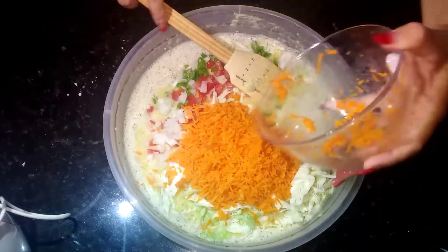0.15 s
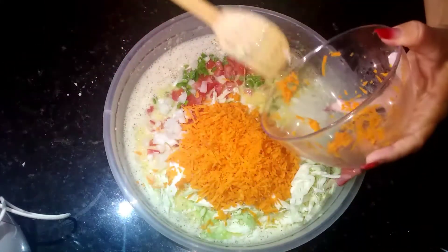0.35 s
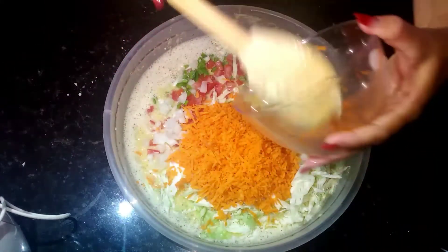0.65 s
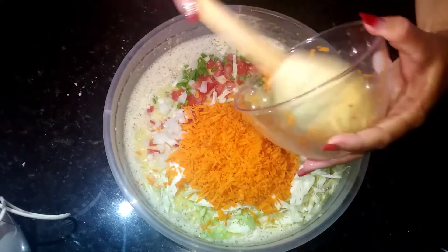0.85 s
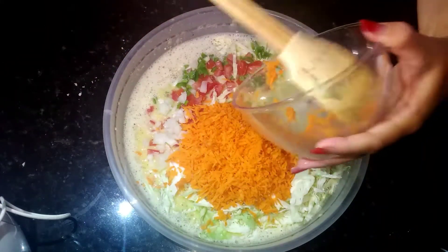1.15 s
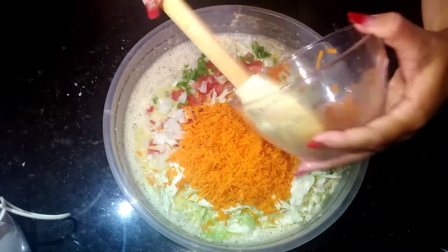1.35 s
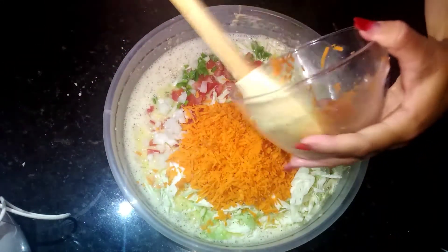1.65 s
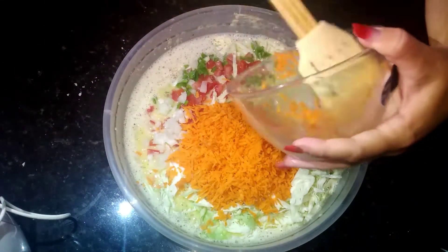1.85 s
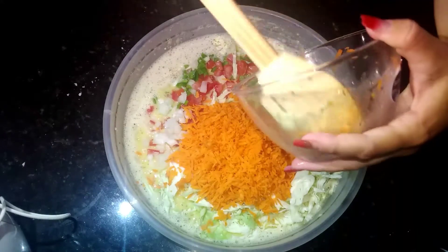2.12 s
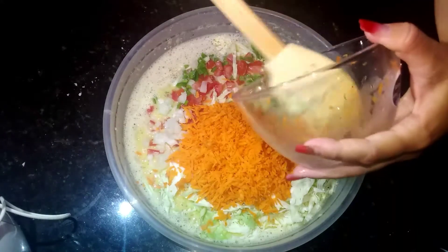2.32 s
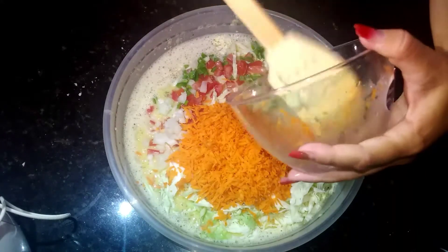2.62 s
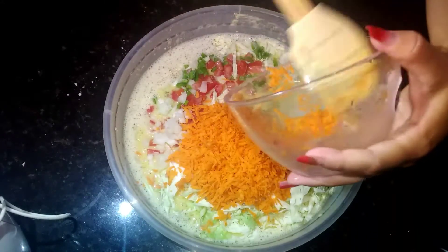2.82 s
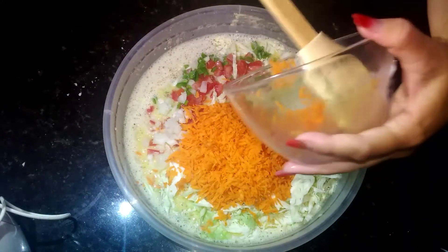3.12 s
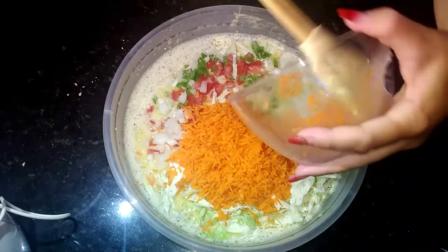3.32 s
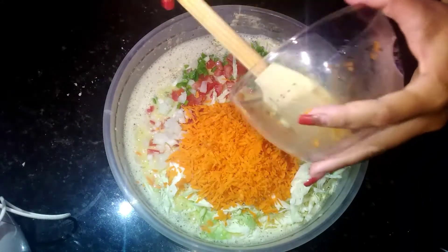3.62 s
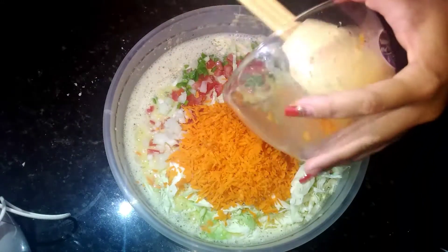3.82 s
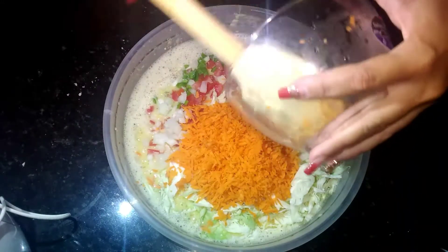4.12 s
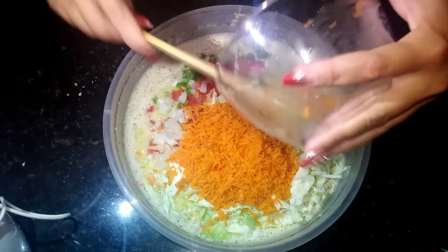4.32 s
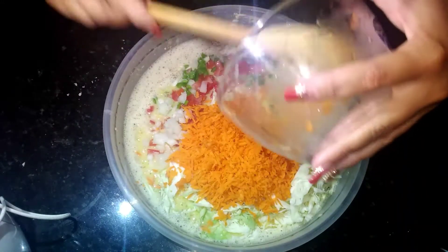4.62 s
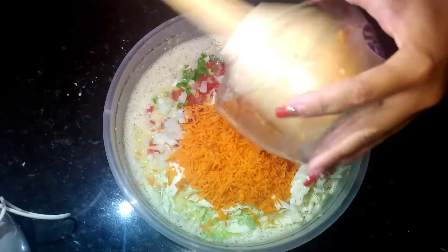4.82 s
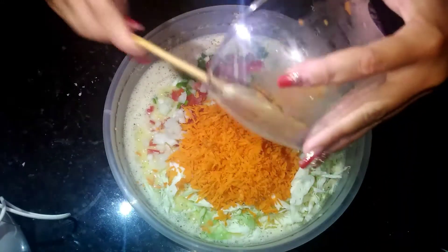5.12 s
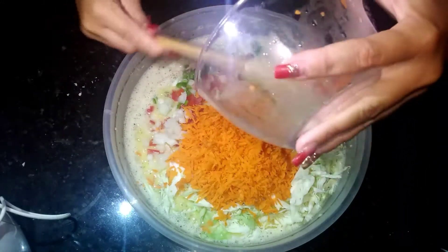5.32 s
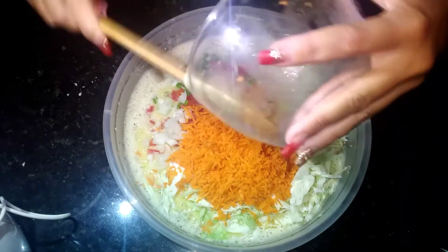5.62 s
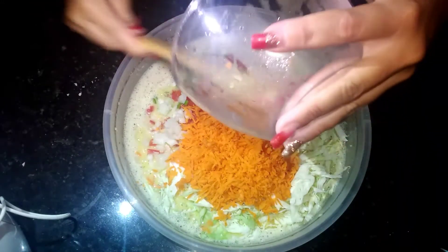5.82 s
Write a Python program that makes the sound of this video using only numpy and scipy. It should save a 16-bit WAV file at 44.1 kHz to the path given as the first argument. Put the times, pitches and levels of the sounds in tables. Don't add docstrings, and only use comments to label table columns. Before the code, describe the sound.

Close to a stereo camera microphone in a kitchen, a soft spatula brushes leftover grated food from a glass bowl. Faint rubbing opens the scene, then one loud glassy knock rings at about one second, quickly damped by the hand. Irregular short scrapes and tiny ticks follow, with a few dull handling thumps later. A refrigerator hums low throughout.

```python
import sys
import numpy as np
from scipy import signal
from scipy.fft import rfft, irfft, next_fast_len
from scipy.io import wavfile
from scipy.ndimage import uniform_filter1d, map_coordinates

SR = 44100
rng = np.random.default_rng(int(sys.argv[2]) if len(sys.argv) > 2 else 0)


def master_out(mix):
    frames = np.transpose(np.atleast_2d(mix))
    ceiling = np.clip(frames, -1, 1)
    pcm = np.round(ceiling * 32767).astype(np.int16)
    wavfile.write(sys.argv[1], SR, pcm)


def boost(x):
    u = np.asarray(x, float) / 20
    return 10 ** u


N = 262629


def evened(x):
    return x / np.sqrt(np.mean(x ** 2) + 1e-20)


def read(points, hz):
    f, value = np.transpose(points)
    return np.interp(np.log(hz + 1), np.log(f + 1), value)


def add(mix, start_s, sound):
    part = mix[max(round(start_s * SR), 0):][:len(sound)]
    part += sound[:len(part)]


def resonate(x, hz, width_hz):
    radius = np.exp(-np.pi * width_hz / SR)
    pole = radius * np.exp(2j * np.pi * hz / SR)
    return 2 * signal.lfilter([1 - radius], [1, -pole], x).real


def drift(top_hz):
    return evened(resonate(resonate(rng.standard_normal(N), 0, top_hz), 0, top_hz))


def sweeps(rows):
    peak_s, length_s, *levels_db = np.transpose(rows)
    t = np.arange(0, N + 64, 64) / SR
    bell = np.exp(-2 * 14.6 * ((t[:, None] - peak_s) / np.maximum(length_s, 0.02)) ** 2)
    return [np.interp(np.arange(N) / SR, t, np.sqrt(bell @ boost(2 * db))) for db in levels_db]


def ring(modes, shares, ring_left, pitch=1):
    t = np.arange(SR // 2) / SR
    sound = 0
    for share, (hz, db, t60) in zip(shares, modes):
        decay = boost(db - 60 * t / t60 / max(ring_left, 0.1))
        sound = sound + share * decay * np.sin(2 * np.pi * pitch * hz * t)
    return sound


# hz, level_db (per Hz)
AIR_COLOUR = [(30, -105), (55, -83.5), (130, -74.5), (280, -88), (450, -89.5), (650, -96), (1000, -96),
              (1500, -100), (2500, -104), (4000, -106), (6000, -112), (8500, -116), (11500, -118),
              (14500, -121)]
# hz, side_minus_mid_db
AIR_SPREAD = [(60, 3.5), (150, -10), (350, 6.5), (700, -3), (1500, -1), (14000, -1.5)]


def air():
    noise = rng.standard_normal((2, N + 2048))
    hz, _, z = signal.stft(noise, SR, nperseg=2048, noverlap=1536)
    patches = uniform_filter1d(rng.standard_normal(z.shape[1:]), 16, 0)
    patches = evened(uniform_filter1d(patches, 8, 1))
    z = z * boost(read(AIR_COLOUR, hz)[:, None] + 10 * np.log10(SR / 2) + 0.76 * patches)
    z[1] *= boost(read(AIR_SPREAD, hz))[:, None]
    return signal.istft(z, SR, nperseg=2048, noverlap=1536)[1][:, :N]


# hz, level_db
MAINS_HUM = (120.3, -43.5)
# multiple, level_db
ROTOR_ORDERS = [(1, -64), (2, -62.5), (3, -63.5), (5, -67), (8, -59), (9, -70)]
# hz, width_hz, start_db, end_db
THIN_WHINES = [(4080, 5.9, -77, -89), (10300, 20, -83, -100)]
# hz, width_hz, level_db, side_db
CASE_MODES = [(158, 64, -63.5, -1.5), (220, 24.3, -59, -24), (361.2, 52, -57.5, -14),
              (407.5, 14, -59.5, -6.5), (454.7, 32, -65.5, -27)]
# start_db, end_db
CASE_SETTLING = (3.5, -3)


def fridge():
    rotor_hz = 58.37
    turns = np.cumsum(rotor_hz * (1 + 0.00202 * drift(0.746))) / SR
    t = np.arange(N) / SR
    mains_hz, mains_db = MAINS_HUM
    mid = boost(mains_db + 0.7 * drift(1.5)) * np.sqrt(2) * np.sin(2 * np.pi * mains_hz * t)
    for multiple, db in ROTOR_ORDERS:
        tone = np.sqrt(2) * np.sin(2 * np.pi * (multiple * turns + rng.random()))
        mid = mid + boost(db + 1.8 * drift(4.2)) * tone
    out = np.array([mid, 0.013 * mid])
    for hz, width_hz, start_db, end_db in THIN_WHINES:
        whine = evened(resonate(rng.standard_normal(N), hz, width_hz))
        out[1] += boost(np.linspace(start_db, end_db, N)) * whine
    settling = boost(np.linspace(*CASE_SETTLING, N))
    for hz, width_hz, db, side_db in CASE_MODES:
        rumble = resonate(resonate(rng.standard_normal((2, N)), hz, width_hz), hz, width_hz)
        out += evened(rumble) * boost([[db], [db + side_db]]) * settling
    return out


# peak_s (most pressure), length_s, level_db, treble_db
BLADE_STROKES = [(0.01, 0.053, -51.5, -5.5), (0.923, 0.081, -54, -9), (1.306, 0.085, -60, -3),
                 (1.445, 0.1, -52.5, -6), (1.616, 0.036, -47.5, -10), (1.746, .13, -60.5, 4),
                 (1.876, 0.2, -57, -3.5), (2.12, 0.21, -69, 7), (2.24, 0.15, -51, -7.5),
                 (2.446, 0.053, -50, -12), (2.529, .14, -56.5, -1.5), (2.77, 0.13, -55, -10),
                 (2.85, .12, -57, -5.5), (3.082, 0.11, -64, 2), (3.179, 0.13, -57.5, -2.1),
                 (3.396, .1, -73, -5), (3.61, 0.057, -52.5, -2.5), (3.88, 0.15, -54, -12),
                 (4.227, 0.16, -56.5, -2), (4.367, .1, -58, -2), (4.545, 0.073, -58, -6),
                 (4.586, 0.15, -61, -9), (4.94, 0.21, -63, -3), (5.044, 0.11, -57, 2),
                 (5.176, 0.17, -56.5, 0.3), (5.32, 0.1, -65, -1.1), (5.757, 0.27, -55.5, -12),
                 (5.886, 0.43, -63.5, -2.1)]
# peak_s (most grip), length_s, low_ring_db, second_ring_db
BOWL_DRAGS = [(0.003, .05, -72, -35.5), (0.056, 0.065, -70, -38), (0.215, 0.19, -54, -43),
              (0.76, 0.17, -65, -60), (0.93, 0.042, -47, -59), (1.1, 0.29, -46.5, -49),
              (1.45, 0.21, -64, -72), (1.62, 0.078, -60.5, -72), (1.9, 0.33, -63, -68),
              (2.24, 0.24, -56.5, -50), (2.45, 0.08, -53.5, -52), (2.54, 0.16, -53, -47),
              (2.81, 0.39, -61, -51), (3.03, 0.12, -63, -78), (3.19, 0.1, -58, -52), (3.39, 0.11, -63, -51),
              (3.63, 0.36, -62.5, -56), (3.81, 0.068, -46, -72), (3.9, 0.18, -53, -72),
              (4.13, 0.083, -54.5, -65), (4.4, .25, -73, -53), (4.54, 0.12, -82, -67),
              (4.88, 0.11, -64, -78), (5.27, 0.18, -65, -69), (5.69, 0.6, -65.5, -72)]
# hz, level_db
HISS_COLOUR = [(1200, -40), (2200, 14), (3200, 19), (4300, 14), (5500, -24), (8000, -19)]
TREBLE_COLOUR = [(2500, -26), (5000, 6), (7000, -4), (10000, -3.5), (13000, -4), (14500, -15)]
# hz, level_db, t60_s
LOW_BOWL_MODES = [(819.3, 4, 0.14), (867, -7, 0.51), (855, 10.5, 0.097), (931, -1, 0.23), (1036, -7.5, 0.3),
                  (720, -16, 0.5)]
SECOND_BOWL_MODES = [(1640, 7.5, 0.031), (1845, -14, 0.33), (1470, -21, 0.016)]


def rub():
    strokes = [(s, length, db, db + treble_db) for s, length, db, treble_db in BLADE_STROKES]
    hiss_gain, treble_gain = sweeps(strokes)
    low_gain, second_gain = sweeps(BOWL_DRAGS)
    slips = rng.standard_normal(N) * boost(0.88 * drift(110.0) + 3.5 * drift(630.0))

    def hiss(colour):
        gain = boost(read(colour, np.fft.rfftfreq(N, 1 / SR)))
        return evened(irfft(rfft(slips) * gain, N))

    def shake(modes):
        return evened(signal.oaconvolve(slips, ring(modes, np.ones(6), 0.58))[:N])

    out = hiss_gain * hiss(HISS_COLOUR) + treble_gain * hiss(TREBLE_COLOUR)
    out = out + boost(5) * low_gain * shake(LOW_BOWL_MODES)
    out = out + boost(-7.0) * second_gain * shake(SECOND_BOWL_MODES)
    return boost(-9) * out


# start_s, level_db, dullness_db, treble_db, length_ms
CLEAR_TICKS = [(0.1352, -62, 20, -15, 2.8), (0.1718, -44.5, 5, -1.5, 2.3), (0.9982, -29.5, -8, -1, 2.06),
               (1.6178, -61, -12, 2, 6.6), (2.7078, -49.5, -11, -9.5, 3.2), (3.0064, -55, -30, 0.5, 3.6),
               (3.7864, -53, -2, -13, 5.4), (3.8656, -60, 2, -22, 3), (4.119, -52.5, 0.5, -22, 2.2),
               (4.8576, -63.5, 4, 11, 2.5), (4.8592, -52, 1.5, -15, 3.4), (5.6613, -45, -4, -7.5, 3.9)]
# start_s, level_db, dullness_db, treble_db
FAINT_TICKS = [(0.941, -63.5, 1, -11), (1.455, -74, 14, -9), (1.278, -70, -9, -3), (1.5, -65, -2.5, -11.5),
               (1.729, -71, -14, -3), (1.871, -64, -3, -12), (2.094, -66, -8, -11), (2.24, -63.5, 7, -6),
               (2.442, -61, -1, -16), (2.549, -61, 2.1, -9), (2.847, -62.5, -7, -7), (3.603, -66, -11, -9),
               (3.985, -69, -9, -19), (4.088, -66, -4, -14), (4.755, -76, -1, 10.1), (4.839, -71, -7, -14),
               (5.622, -72, 4, -15), (5.869, -67.5, 7, -6)]
# low_hz, high_hz
TICK_BANDS = [(900, 1900), (2000, 3500), (3500, 5000), (5000, 14000)]
# hz, width_hz, share
RIM_SONG = (3050, 330, 0.9)


def ticks():
    faint_ms = 3.3
    dull_upper = 0.23
    rim_hz, rim_width_hz, rim_share = RIM_SONG
    out, t = np.zeros((2, N)), np.arange(2048) / SR
    filters = [signal.butter(3, edges, "band", fs=SR, output="sos") for edges in TICK_BANDS]
    rows = CLEAR_TICKS + [(*row, faint_ms) for row in FAINT_TICKS]
    noises = rng.standard_normal((len(rows), 2, 2048))
    for (start_s, level_db, dull_db, treble_db, ms), noise in zip(rows, noises):
        levels_db = level_db + np.array([dull_db, 0, -dull_upper * dull_db, treble_db])
        shape = np.minimum(t / 0.0002, 1) * np.exp(-(t / (0.002 * max(ms, 0.5))) ** 2)
        spectrum = rfft(noise * shape)
        even = irfft(spectrum / uniform_filter1d(abs(spectrum), size=7, axis=1))
        even = even * (t < 0.004 * ms)
        bands = [signal.sosfilt(f, even) for f in filters]
        bands[1] = bands[1] + rim_share * resonate(bands[1], rim_hz, rim_width_hz)
        sound = sum(boost(db + 23.5) * b / np.linalg.norm(b[0]) for db, b in zip(levels_db, bands))
        for line, part in zip(out, sound):
            add(line, start_s, part)
    return out


# start_s, level_db (peak), second_modes_db, ring_left (factor, by the hand)
BOWL_BLOWS = [(0.1355, -44, -1, 0.29), (0.749, -50, -10, 0.25), (0.914, -50.5, -11, 0.4),
              (0.999, -17, 2.5, 0.63), (1.406, -45, -22, 0.61), (1.875, -56.5, -17, 0.3),
              (2.188, -50.5, 2, 0.99), (2.208, -45, 2, 1), (2.507, -47.5, -12, 0.21),
              (2.748, -52.5, -16, 0.39), (3.2, -60.5, -1, 0.52), (3.354, -61.5, -6, 0.76),
              (3.789, -41.5, -21, 0.32), (3.867, -55.5, -10, 0.75), (3.903, -49.5, -14, 0.36),
              (3.975, -59.5, -18, 0.46), (4.091, -44.5, -19, 0.35), (4.522, -57, -16, 0.82),
              (4.561, -49, -14, 0.33)]
# hz, level_db, t60_s
UPPER_BOWL_MODES = [(2990, -18, 0.17), (2820, 6, 0.062), (3190, -10, 0.1), (3160, -22, .05),
                    (5400, -7, .04), (5300, -12, .09)]


def blows():
    out, t = np.zeros(N), np.arange(SR // 2) / SR
    chances = rng.uniform(0.8, 1.2, (len(BOWL_BLOWS), 6))
    for (start_s, db, second_db, ring_left), shares in zip(BOWL_BLOWS, chances):
        pitch = 1 + 0.025 * (db < -30) * 5 * (shares[-1] - 1)
        upper_db = -11.5 + 0.3 * (db + 19)
        sound = ring(LOW_BOWL_MODES, shares, ring_left, pitch)
        sound += boost(second_db) * ring(SECOND_BOWL_MODES, shares, ring_left, pitch)
        sound += boost(upper_db) * ring(UPPER_BOWL_MODES, shares, ring_left, pitch)
        contact_s = 0.000504 * boost(-0.4 * (db + 18.0))
        add(out, start_s - contact_s, boost(db - 6.0) * sound * (1 - np.exp(-t / contact_s)))
    return out


# start_s, level_db (peak)
HAND_PUSHES = [
    (0.9985, -45),
    (4.119, -32),
    (4.861, -29),
    (5.6611, -26),
]


def pushes():
    out = np.zeros(N)
    for start_s, db in HAND_PUSHES:
        u = np.arange(1500) / SR / 0.00097
        add(out, start_s, -boost(db) * u * np.exp(1 - u) * np.cos(0.61 * u))
    return out


# hz, t60_s
KITCHEN_DECAY = [(300, 0.1), (900, 0.75), (2000, 0.55), (5000, 0.35), (12000, 0.31)]
# hz, level_db
ECHO_COLOUR = [(300, -5), (850, -10.5), (1700, -13.5), (3000, -2), (4300, -10.5), (5400, -4.5),
               (7000, -3.5), (12000, -9.5)]


def kitchen(x):
    taps = np.zeros((2, SR // 2))
    starts = np.arange(160, SR // 2 - 20, 20)
    at = starts + rng.integers(0, 20, (2, len(starts)))
    np.put_along_axis(taps, at, rng.choice([-1., 1.], at.shape), 1)
    hz, t, z = signal.stft(taps, SR, nperseg=256)
    decay = boost(-60 * t / read(KITCHEN_DECAY, hz)[:, None])
    energy = len(starts) * (decay ** 2).mean(1, keepdims=True)
    z = z * boost(read(ECHO_COLOUR, hz))[:, None] / np.sqrt(energy)
    tail = signal.istft(z * decay, SR, nperseg=256)[1]
    return signal.fftconvolve(x[None], tail, axes=1)[:, :N]


def ports(x, share):
    n = np.arange(N)
    lag = share * 0.15 * SR / 1000
    late = map_coordinates(x, [n - lag / 2], order=3)
    early = map_coordinates(x, [n + lag / 2], order=3)
    return np.array([late, early])


def scene():
    mid, side = air() + fridge()
    rubbing = rub()
    common, apart = ticks()
    rings = blows() + pushes()
    side = side + 0.89 * apart
    near = ports(rubbing, 0.66)
    near = near + ports(common, 0.1)
    near = near + ports(rings, 0.52)
    return near + kitchen(rings + common + rubbing) + np.array([mid + side, mid - side])


def band_limit(x):
    return signal.sosfilt(signal.butter(12, 15020, fs=SR, output="sos"), x)


# hz, share
CROSS_FEED = [(60, 0.66), (400, 0.58), (1000, 0.5), (2100, .98), (3100, 0.66), (4300, 0.53), (6300, .44),
              (14000, 0.05)]


def record(dry):
    cross_ms, edge_hz = 0.4793, 14250
    size = next_fast_len(N + 512)
    hz = np.fft.rfftfreq(size, 1 / SR)
    cross = np.clip(read(CROSS_FEED, hz), 0, 0.98) * np.exp(-2j * np.pi * hz * cross_ms / 1000)
    wide = dry - irfft(rfft(dry[::-1], size) * cross, size)[:, :N]
    power_db = 10 * np.log10(abs(uniform_filter1d((wide ** 2).mean(0), 400)) + 1e-12)
    fall = np.arange(N) * 30.7 / SR
    held_db = np.maximum.accumulate(power_db + fall) - fall
    over_db = np.maximum(held_db + 30, 0)
    ducked = wide / boost(0.37 * uniform_filter1d(over_db, 300))
    ducked = signal.oaconvolve(ducked, signal.firwin(255, edge_hz, fs=SR)[None], "same")
    return band_limit(ducked)


dry = scene()
out = record(dry)
master_out(out)
```